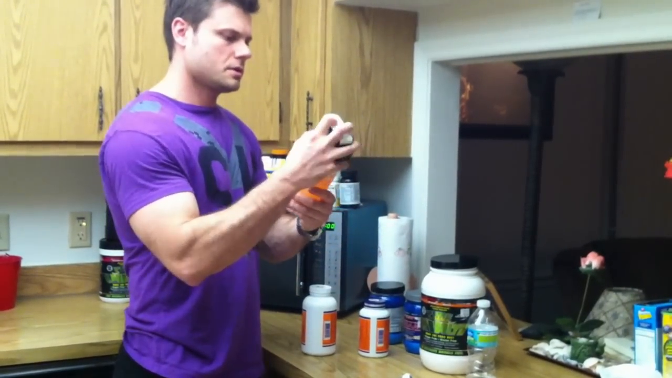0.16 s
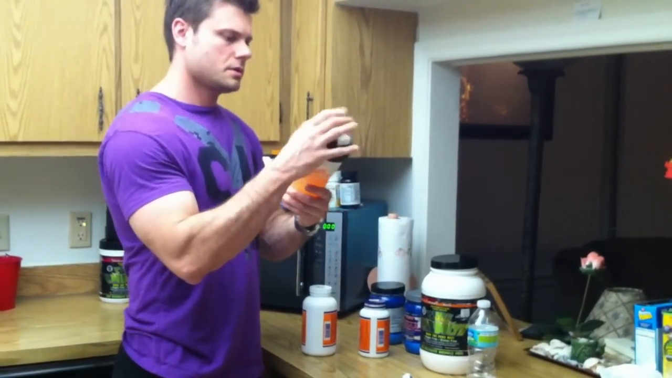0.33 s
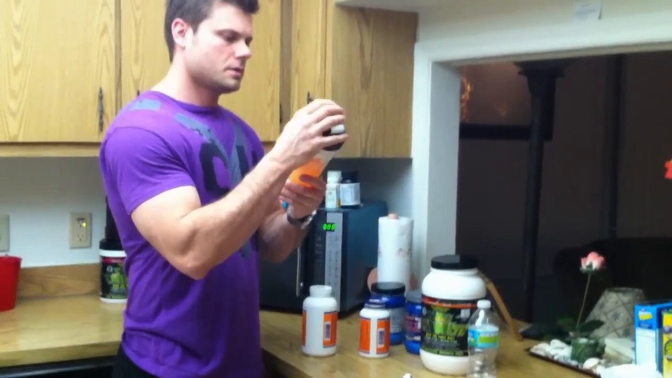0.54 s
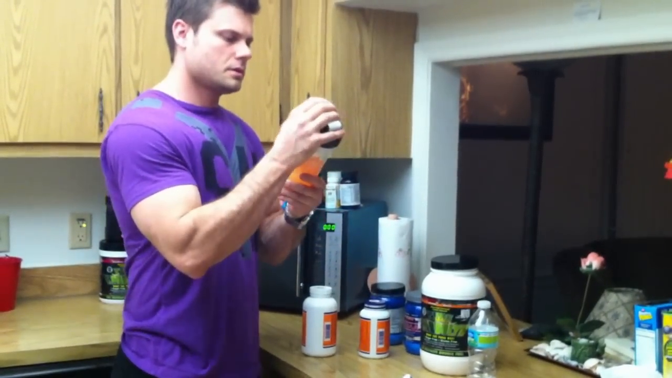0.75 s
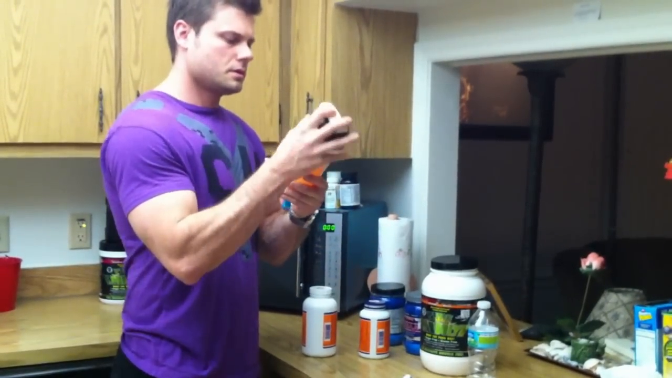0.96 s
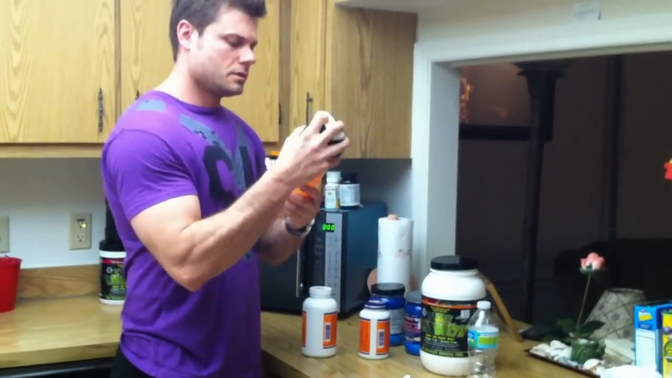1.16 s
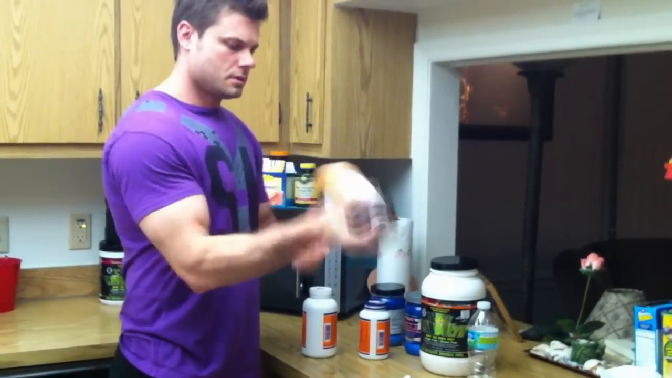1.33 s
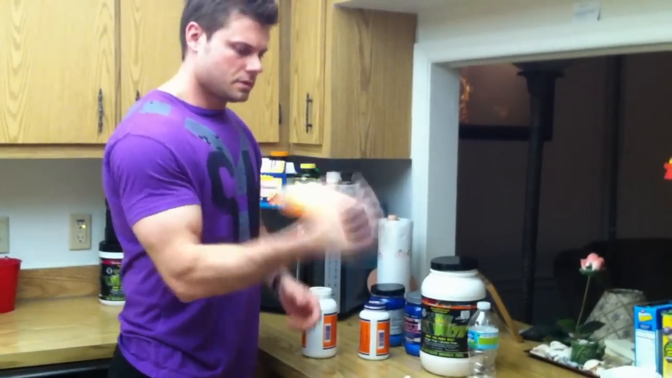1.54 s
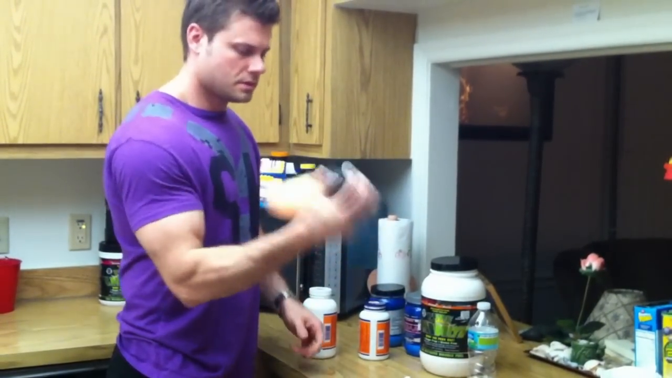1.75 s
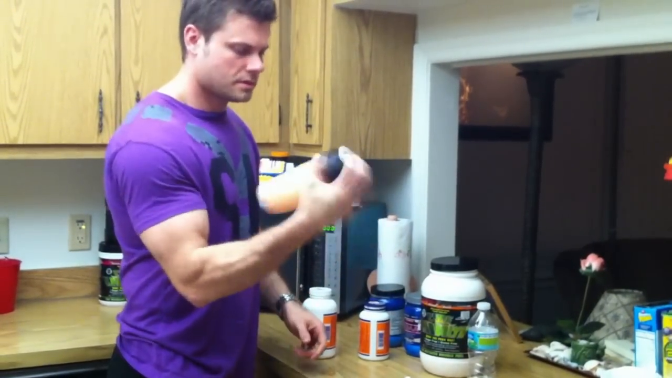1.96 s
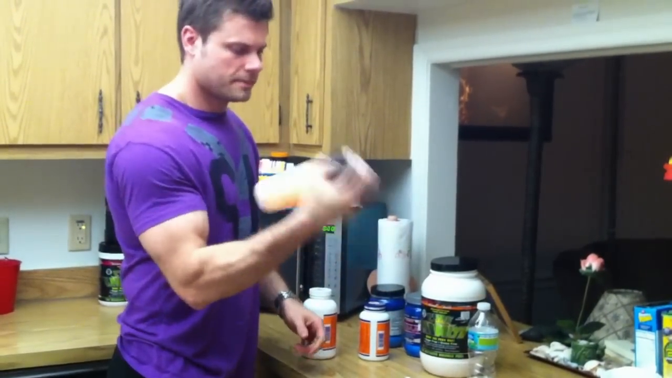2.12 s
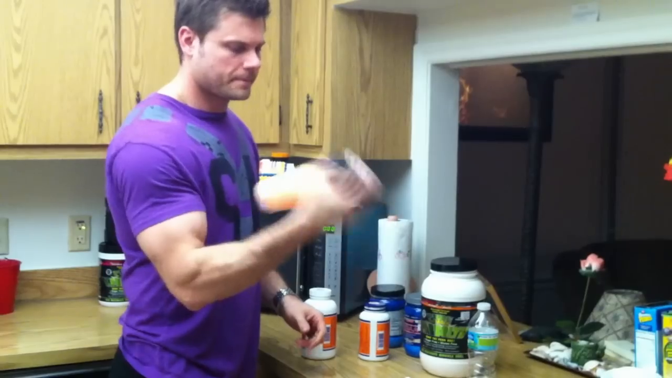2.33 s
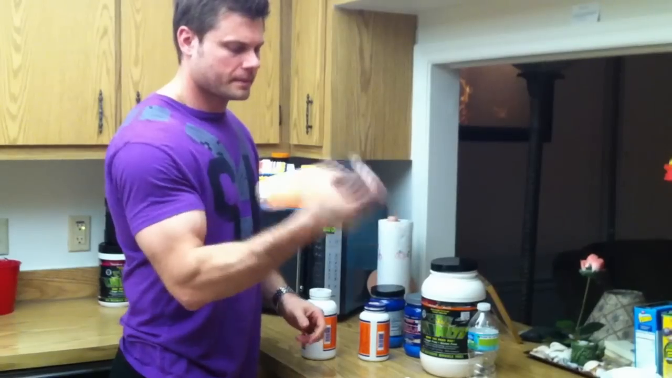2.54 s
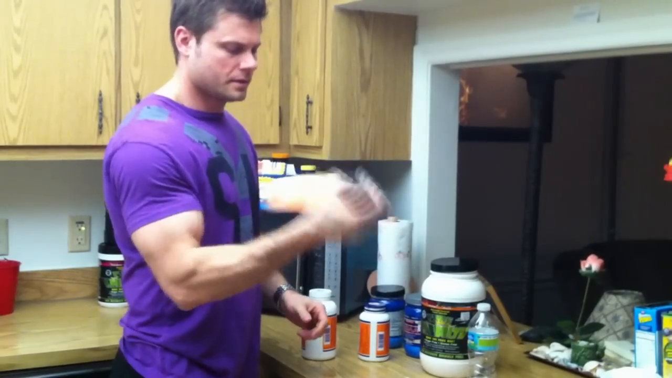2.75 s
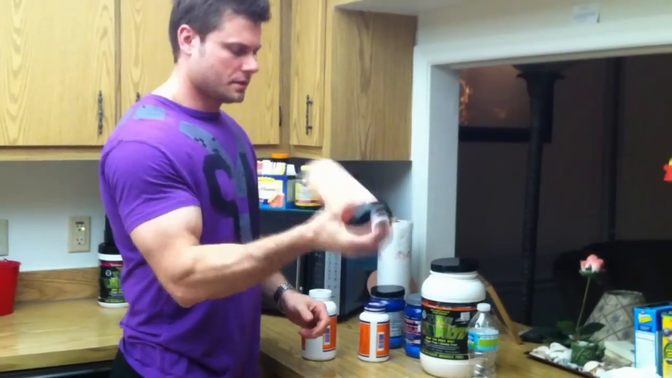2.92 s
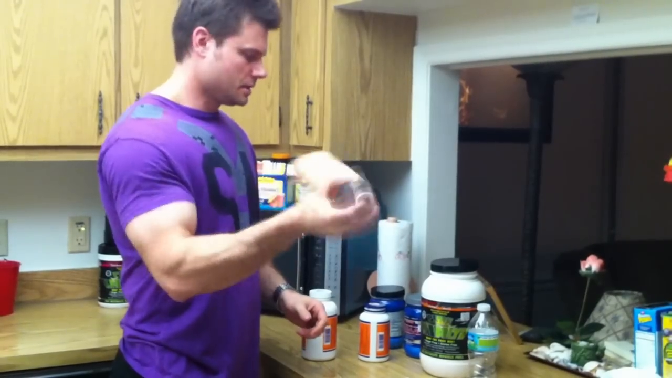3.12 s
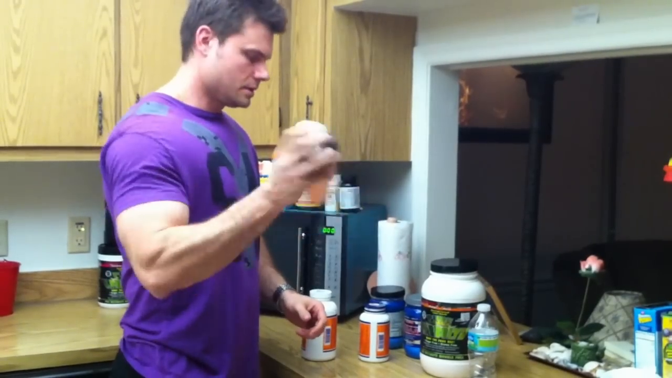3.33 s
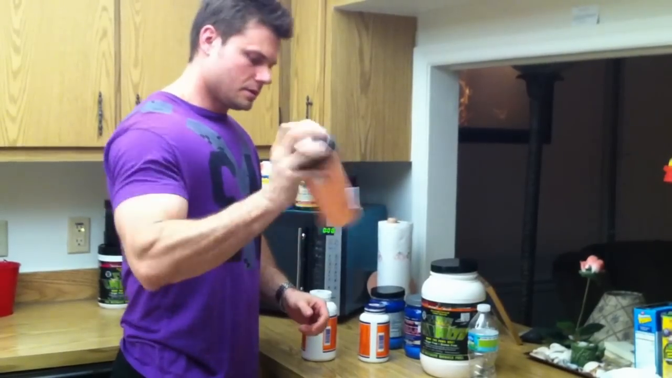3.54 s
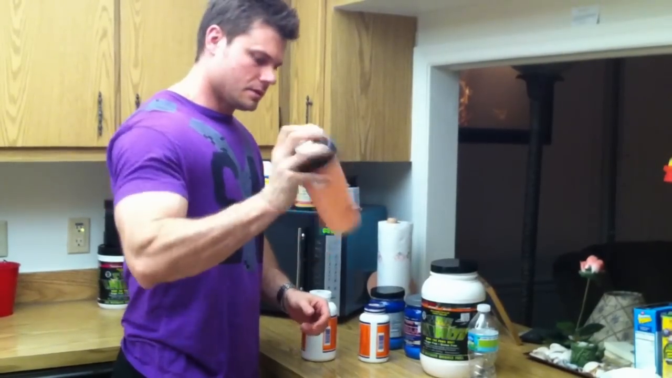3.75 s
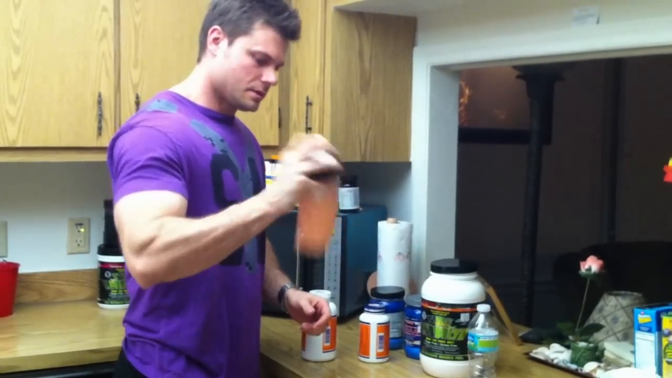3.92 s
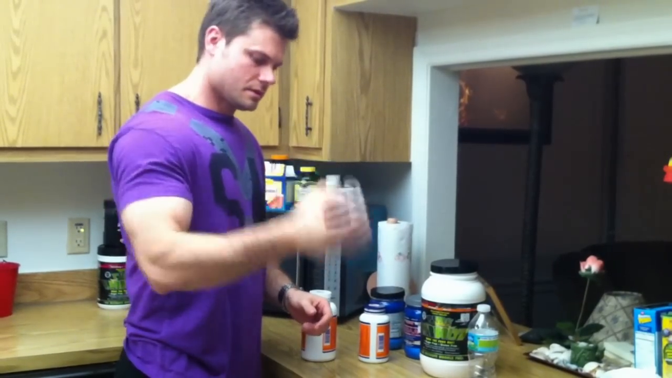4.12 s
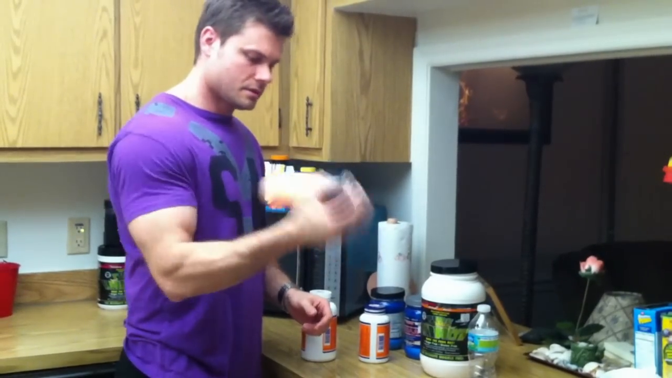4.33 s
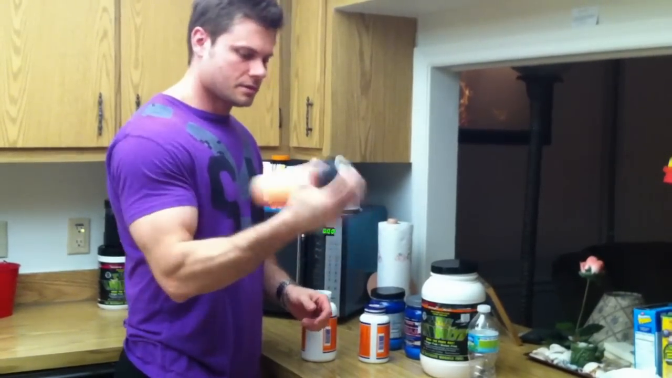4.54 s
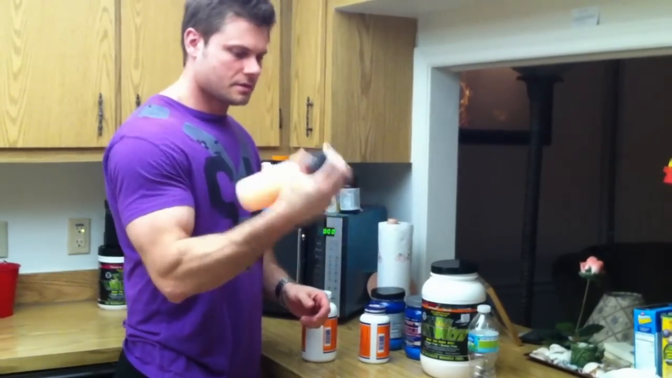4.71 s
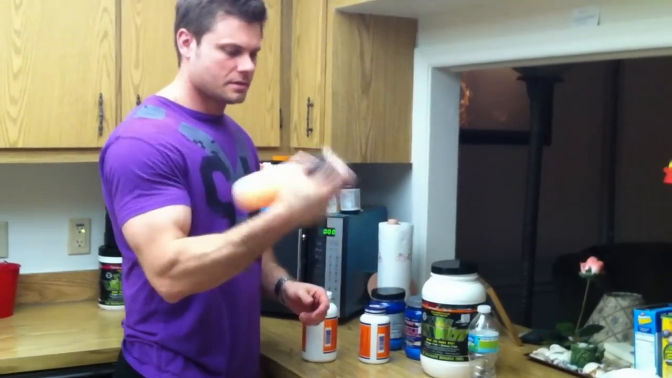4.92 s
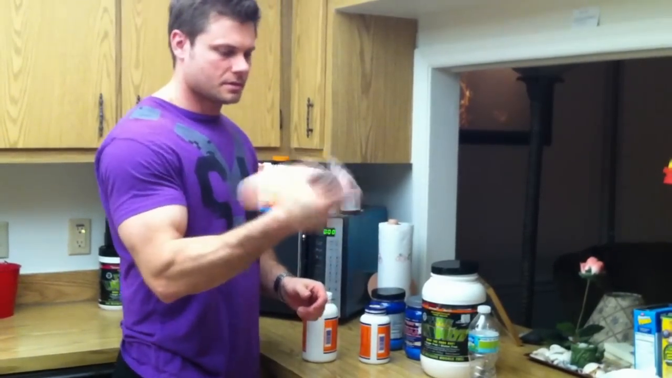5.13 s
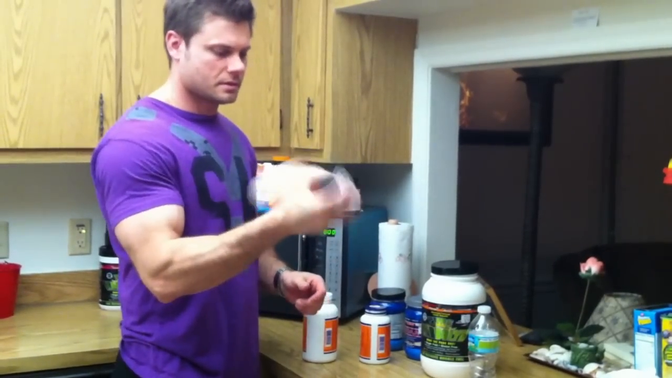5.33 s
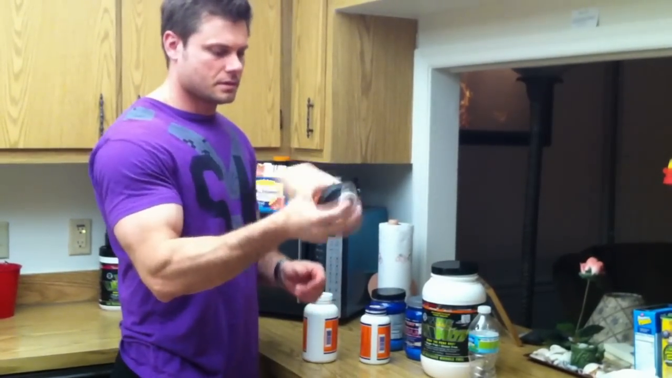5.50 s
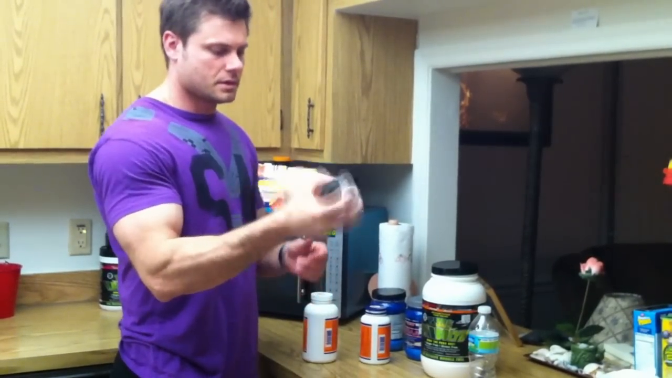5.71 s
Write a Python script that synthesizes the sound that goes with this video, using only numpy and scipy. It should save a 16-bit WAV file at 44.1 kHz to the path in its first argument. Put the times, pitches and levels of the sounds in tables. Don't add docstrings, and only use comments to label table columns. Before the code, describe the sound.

A quiet small kitchen, with soft low room noise and a faint fridge hum. At the very start fingers lightly touch a plastic lid, and two more small dry ticks come near 0.4 s. At 0.78 s the cap snaps shut: a loud, hard, bright plastic crack, with clustered early reflections and a short diffuse tail; the level dips slightly afterwards and recovers. Near-silence follows, with a faint grip tick at 1.37 s. From about 1.5 s the bottle is shaken hard until the end near 5.9 s. About four and a half full cycles per second alternate a bright spraying slap at the lid with a duller, hollow thump and splash-back at the base. Strokes vary in strength, strongest around 2.2 s. Between them the liquid churns, bubbles, gulps air and hisses with fine foam. Hard walls add brief reverberation; the microphone is mono and fairly near, with limited top treble.

```python
import sys
import numpy as np
from scipy import signal
from scipy.io import wavfile
from scipy.ndimage import uniform_filter1d

SR = 44100
rng = np.random.default_rng(int(sys.argv[2]) if len(sys.argv) > 2 else 0)


def pcm_store(signal):
    levels = np.round(np.clip(np.atleast_2d(signal), -1, 1) * 32767)
    wavfile.write(sys.argv[1], SR, levels.astype(np.int16).T)


def undo_db(level):
    steps = np.asarray(level, float) / 20
    return 10 ** steps


N = 258731
T = np.arange(N) / SR

# f/Hz, level/dB
AIR_SPECTRUM = [(15, -20.5), (30, -29.5), (60, -27.5), (90, -20.5), (115, -16.5), (160, -8), (250, -6.5),
                (460, -7), (1000, -13), (1800, -14.5), (2300, -20.5), (5800, -23.5), (9800, -25.5),
                (11500, -30)]
AIR_DB = -60.5
# f/Hz, level/dB, line width/Hz
FRIDGE_TONES = [(122, -79.5, 6.), (240, -80, 11), (355, -80, 13), (365, -86.5, 12), (466, -75.5, 9)]
# t/s, peak level/dB, length/s
FINGER_TICKS = [
    (0.011, -44.5, 0.012),
    (0.025, -49, 0.02),
    (0.377, -50, 0.017),
    (0.398, -42, 0.0126),
    (0.4544, -53.5, 0.02),
    (1.366, -49, 0.012),
]
# t/s, peak level/dB
SNAP_ARRIVALS = [
    (.7810, 3),
    (.7826, 4),
    (.7858, -2),
    (.7872, -1),
    (.7897, 1),
    (.7946, 2),
    (.8033, -4),
    (.8083, -4),
]
# f/Hz, level/dB
CAP_SPECTRUM = [(90, -68), (150, -36), (330, -28.5), (575, -33), (780, -22), (1030, -15.5), (1560, -5.5),
                (2250, 0), (2900, -6.5), (3500, -14), (5300, -11), (7000, -16.5), (8600, -24.5),
                (10300, -19.5), (11500, -23.5)]
# f/Hz, width/Hz
CAP_MODES = [(2250, 850), (5300, 670), (7000, 1300), (10200, 530)]
# f/Hz, T60/s
KITCHEN_T60 = [(250, 0.36), (660, 0.28), (1740, 0.32), (4590, 0.36)]
# t/s, level/dB
CHURN_EFFORT = [(1.5, -72), (1.6, -50.5), (1.71, -48.5), (2.39, -47), (2.85, -46.5), (3.18, -50),
                (3.99, -48), (4.2, -51), (4.4, -48), (5.06, -49), (5.63, -49.5), (5.73, -47.5),
                (5.87, -53.5)]
# f/Hz, level/dB
WALL_SPECTRUM = [(71, -46), (120, -16.5), (256, -4.5), (416, -10.5), (470, -7), (522, -10), (787, -2.5),
                 (1020, -5), (1730, -2.5), (2140, -1), (3750, -14.5), (4500, -14), (5850, -34),
                 (9900, -120)]
# f/Hz, level/dB
SPRAY_SPECTRUM = [(1800, -14), (3000, -5), (4000, -5.5), (5600, -4), (7000, -13.5), (8500, -11),
                  (10000, -11), (11500, -12)]
# f/Hz, level/dB
FOAM_SPECTRUM = [(1800, -22), (3000, -1), (4000, -3.5), (5800, -1.5), (7200, -6), (8500, -8), (10000, -12),
                 (11500, -13)]
# t/s, slap level/dB, slap length/s, spray lead/s, spray level/dB
LID_THROWS = [(1.531, -46, 0.053, 0.0034, -37.5), (1.7535, -34.5, .054, 0.019, -33),
              (1.983, -32.5, .06, 0.017, -29.5), (2.203, -26, 0.029, 0.018, -27),
              (2.427, -30, 0.037, 0.013, -29), (2.653, -38.5, 0.046, 0.03, -31.5),
              (2.845, -37, 0.04, 0.0048, -30), (3.087, -31, 0.028, 0.023, -29),
              (3.3045, -37, 0.06, 0.028, -34), (3.5183, -31, 0.024, 0.0069, -31.5),
              (3.713, -40.5, 0.096, 0.017, -37.5), (3.918, -31.5, 0.027, 0.017, -33.5),
              (4.131, -28.5, 0.021, 0.014, -34), (4.3235, -36.5, 0.067, 0.0071, -34),
              (4.57, -32.5, .034, 0.012, -31), (4.766, -35.5, 0.052, .018, -32),
              (5.0166, -30, 0.024, 0.02, -30.5), (5.23, -41, 0.059, 0.019, -35),
              (5.464, -39.5, 0.043, 0.031, -36.5), (5.6764, -32, 0.029, 0.0058, -31)]
# t/s, thump level/dB, air pocket f/Hz, jolt level/dB
BULK_LANDINGS = [(1.538, -64, 750, -46), (1.766, -38.5, 695, -40), (2.005, -39.5, 710, -44),
                 (2.217, -34, 840, -40), (2.435, -41, 795, -43), (2.675, -59, 805, -47),
                 (2.834, -43, 1210, -49), (3.082, -39.5, 795, -64), (3.111, -42, 1290, -58),
                 (3.313, -40.5, 778, -50), (3.525, -61, 730, -45), (3.933, -38, 666, -46),
                 (4.145, -43, 794, -59), (4.339, -34.5, 850, -40.5), (4.577, -41, 725, -55),
                 (4.788, -36.5, 1300, -52), (5.008, -49, 800, -48), (5.235, -62, 800, -52),
                 (5.493, -39, 856, -54), (5.698, -46, 965, -51)]
# t/s, thump level/dB, air pocket f/Hz, jolt level/dB, splash-back level/dB
BASE_THROWS = [(1.654, -38, 1390, -60, -40), (1.902, -41.5, 1270, -56, -49), (2.112, -35.5, 1360, -40, -43),
               (2.323, -38, 1300, -40.5, -54), (2.536, -38, 1340, -45, -42.5), (2.75, -42.5, 730, -59, -44),
               (2.939, -45.5, 1340, -52, -55), (3.196, -41, 1480, -46, -54), (3.419, -38.5, 980, -42, -65),
               (3.606, -40.5, 1190, -60, -54), (3.8, -50, 1280, -58, -40), (4.024, -35, 820, -43.5, -37.5),
               (4.232, -38, 1170, -40.5, -50), (4.462, -38, 1360, -43, -58),
               (4.684, -39.5, 1190, -40.5, -46), (4.915, -39, 1260, -49, -44), (5.13, -37.5, 890, -45, -41),
               (5.352, -37.5, 1370, -45, -47), (5.575, -44, 1230, -66, -54), (5.797, -40.5, 1310, -48, -59)]
# t/s, slap level/dB, spray level/dB
STRAY_TONGUES = [(1.5567, -51, -59), (1.664, -41.5, -41), (3.178, -38, -55), (3.0755, -45, -43),
                 (1.8435, -44, -36.5), (2.6841, -39, -52), (2.7156, -45, -43), (3.2823, -47, -56),
                 (3.6405, -44, -55), (4.07, -49, -33), (4.7075, -40, -54), (4.7914, -51, -48),
                 (4.9869, -37, -45), (5.173, -56, -39.5), (5.255, -53, -38), (5.405, -55, -39),
                 (5.5137, -40.5, -39.5), (5.7646, -40.5, -48)]
# t/s, peak level/dB, f/Hz
AIR_GULPS = [(1.772, -46, 329), (2.005, -45, 730), (2.225, -45, 790), (2.33, -47, 1290), (3.095, -46, 802),
             (3.212, -50, 429), (3.682, -41, 5770), (3.925, -39, 702), (4.027, -44, 802), (4.033, -44, 258),
             (4.1345, -40, 2240), (4.231, -46, 1170), (4.245, -50, 476), (4.348, -45, 850),
             (4.487, -43, 498), (4.705, -47, 478), (4.92, -44, 760), (5.133, -42, 856), (5.679, -36, 2150)]

LID_HZ, SPLASH_HZ, SPRAY_HZ, PITCH_SCATTER = 2240, 2110, 5700, 0.023
LID_JOLT_HZ, BASE_JOLT_HZ, JOLT_LAG_S, JOLT_S = 265, 396, 0.01112, 0.018
SPRAY_S, SPRAY_SHARE = 0.022, 0.34
SPLASH_S, SPLASH_LAG_S, SPLASH_SLAP_DB = 0.032, 0.004, -3
THUMP_S, THUMP_AT_DB, SHORTER_PER_DB = 0.033, -41.5, 0.06
SLAP_CONTACT, SPRAY_CONTACT, THUMP_CONTACT, JOLT_CONTACT = 4, 5.2, 8.2, 8
SUDDEN = 0.3
FOAM_DB, FOAM_HUSH = -6, 0.76
GULP_S, GULP_RISE_S, GULP_GLIDE, SMALL_IS_SHORT = 0.0111, 0.0022, 0.0503, 0.31


def evened(x):
    return x / np.sqrt(np.mean(x ** 2) + 1e-20)


def read(points, hz):
    f, value = np.transpose(points)
    return np.interp(np.log(hz + 1), np.log(f + 1), value)


def colour(points, size=4096):
    level_db = read(points, abs(np.fft.fftfreq(size, 1 / SR)))
    log_gain = np.log(undo_db(np.maximum(level_db, -100)))
    spectrum = np.exp(np.conj(signal.hilbert(log_gain)))
    taps = np.fft.ifft(spectrum).real[:size // 2]
    return taps / np.linalg.norm(taps)


def through(x, taps):
    return signal.oaconvolve(x, taps)[:N]


def droplets(per_s, spread_db):
    size_db = spread_db * np.minimum(rng.exponential(1, N), 4)
    size = undo_db(size_db) * rng.choice([-1., 1.], N)
    return evened(size * (rng.random(N) < per_s / SR))


def surge(s, db, length, rise):
    start = int(s * SR)
    u = np.maximum(T[start:start + SR // 5] - s, 0)
    return start, undo_db(db) * (1 - np.exp(-u / rise)) * np.exp(-u / max(length, .002))


def bursts(rows, rise):
    power = np.zeros(N)
    for s, db, length in rows:
        start, shape = surge(s, db, length, rise)
        power[start:start + len(shape)] += shape ** 2
    return np.sqrt(power)


def ringing(rows, drive, rise, width_share):
    out = np.zeros(N)
    for s, db, hz, length, contact in rows:
        start, shape = surge(s, db, length, rise)
        push = shape * drive[start:start + len(shape)]
        push[[20, 90]] += contact * undo_db(db)
        r = np.exp(-np.pi * width_share * hz / SR)
        poles = [1, -2 * r * np.cos(2 * np.pi * hz / SR), r * r]
        ring = signal.lfilter([1, 0, -1], poles, push)
        ring = signal.lfilter([1, 0, -1], poles, ring)
        out[start:start + len(shape)] += ring * ((1 - r * r) / 2) ** (3 / 2)
    return out


def tail(gap_s, slower=1):
    taps = np.zeros(SR // 2)
    at = np.arange(0, len(taps) - 12, 12)
    taps[at + rng.integers(0, 12, len(at))] = rng.choice([-1., 1.], len(at))
    hz, t, z = signal.stft(taps, SR, nperseg=128)
    decay = undo_db(-60 * t / slower / read(KITCHEN_T60, hz)[:, None])
    taps = signal.istft(z * decay, SR, nperseg=128)[1]
    taps = taps * (1 - np.exp(-np.arange(len(taps)) / SR / gap_s))
    return taps / np.linalg.norm(taps)


def air():
    frames, hz = N // 1024 + 5, np.fft.rfftfreq(4096, 1 / SR)
    a, b, patches = rng.standard_normal((frames, 2049, 3)).T
    patches = uniform_filter1d(patches, size=30, axis=0)
    patches = evened(uniform_filter1d(patches, size=3, axis=1))
    z = (a + 1j * b) * undo_db(read(AIR_SPECTRUM, hz)[:, None] + 0.52 * patches)
    out = undo_db(AIR_DB) * evened(signal.istft(z, nperseg=4096, noverlap=3072)[1][:N])
    for f, db, width in FRIDGE_TONES:
        walk = uniform_filter1d(np.cumsum(rng.standard_normal(N)), size=1200)
        wander = walk * np.sqrt(2 * np.pi * width / SR)
        out += np.sqrt(2) * undo_db(db + 2.0) * np.sin(2 * np.pi * f * T + wander)
    return out


def fingers():
    contacts = bursts(FINGER_TICKS, .003) * droplets(5600, 2.02)
    ticks = through(contacts, colour(CAP_SPECTRUM))
    return undo_db(-7.5) * (ticks + 0.86 * np.diff(ticks, prepend=0))


def snap():
    click = colour(CAP_SPECTRUM)
    for hz, width in CAP_MODES:
        r, turn = np.exp(-np.pi * width / SR), np.cos(2 * np.pi * hz / SR)
        click = signal.lfilter([r * r, -2 * r * turn, 1], [1, -2 * r * turn, r * r], click)
    hits = np.zeros(N)
    for s, db in SNAP_ARRIVALS:
        near = round(s * SR) + np.arange(-16, 17)
        hits[near] += undo_db(db + 7.0) * np.sinc(near - s * SR) * np.hanning(33)
    release_s = SNAP_ARRIVALS[0][0]
    before = release_s - T
    creep = undo_db(-27 - 3200 * np.clip(before, 0, .1)) * (before > 0) * rng.standard_normal(N)
    fading = tail(.006)
    fading = fading + undo_db(-16.5) * tail(.05, slower=1.65)
    late = np.roll(np.pad(fading, (0, N))[:N], round(release_s * SR))
    return through(hits + creep + undo_db(17.0) * late, click)


def scattered(rows):
    return [(s, db, hz * np.exp(PITCH_SCATTER * rng.standard_normal()), *rest) for s, db, hz, *rest in rows]


def landings():
    slaps, sprays = [], []
    for s, slap_db, length, lead, spray_db in LID_THROWS:
        slaps.append((s, slap_db, LID_HZ, length, SLAP_CONTACT * (SPLASH_S / length) ** SUDDEN))
        sprays.append((s - lead, spray_db, SPRAY_HZ, SPRAY_S + SPRAY_SHARE * length, SPRAY_CONTACT))
    splashes = [(s + SPLASH_LAG_S, db + SPLASH_SLAP_DB, db) for s, *_, db in BASE_THROWS]
    for s, slap_db, spray_db in splashes + STRAY_TONGUES:
        slaps.append((s, slap_db, SPLASH_HZ, SPLASH_S, SLAP_CONTACT))
        sprays.append((s, spray_db, SPRAY_HZ, SPLASH_S, SPRAY_CONTACT))
    thumps, jolts = [], []
    for rows, jolt_hz in ((BULK_LANDINGS, LID_JOLT_HZ), (BASE_THROWS, BASE_JOLT_HZ)):
        for s, db, pocket_hz, jolt_db, *_ in rows:
            length = min(THUMP_S * np.exp(-SHORTER_PER_DB * (db - THUMP_AT_DB)), .08)
            thumps.append((s, db, pocket_hz, length, THUMP_CONTACT))
            jolts.append((s + JOLT_LAG_S, jolt_db, jolt_hz, JOLT_S, JOLT_CONTACT))
    return scattered(slaps), scattered(sprays), thumps, scattered(jolts)


def flight(rows):
    hush_db = np.zeros(N)
    for s, db, *_ in rows:
        end = int(s * SR)
        approach = np.exp(-(s - T[end - 4000:end]) / 0.085)
        hush_db[end - 4000:end] += 0.11 * max(db + 47.0, 0) * approach
    return undo_db(-np.minimum(hush_db, 12))


def spraying(rows):
    mist = droplets(7000, 1.0)
    envelope = bursts([(s, db, length) for s, db, _, length, _ in rows], 0.026)
    broad = through(envelope * mist, colour(SPRAY_SPECTRUM))
    return undo_db(-5) * broad + undo_db(-16) * ringing(rows, mist, 0.0045, 0.58)


def slapping(rows):
    return undo_db(-6.5) * ringing(rows, droplets(3000, 1.0), 0.00069, 0.39)


def thumping(rows):
    pockets = undo_db(-5) * ringing(rows, droplets(3000, 2.2), 0.011, 0.35)
    envelope = bursts([(s, db, length) for s, db, _, length, _ in rows], 0.0051)
    return pockets + undo_db(-6.0) * through(envelope * droplets(4000, 2.9), colour(WALL_SPECTRUM))


def jolting(rows):
    return undo_db(-3.5) * ringing(rows, droplets(1200, 5.6), 0.0069, 0.84)


def bubbles(per_s, low_hz, high_hz, cycles, count):
    out = np.zeros(N)
    for hz in np.geomspace(low_hz, high_hz, count):
        u = np.arange(int(3 * cycles / hz * SR)) / SR * hz / cycles
        note = np.sin(2 * np.pi * cycles * u * (1 + 0.15 * u))
        note = note * np.exp(-2 * u) * (1 - np.exp(-12 * u))
        out += through(droplets(per_s / count, 1.5), note / np.linalg.norm(note)) * np.sqrt(hz)
    return evened(out)


def churning(drive):
    stirred = 1.29 * droplets(3000, 2.5) + 0.47 * bubbles(600, 300, 3700, 2.5, count=10)
    return through(undo_db(-5) * drive * stirred, colour(WALL_SPECTRUM))


def foaming(drive):
    return through(undo_db(FOAM_DB) * drive * droplets(8000, 2.9), colour(FOAM_SPECTRUM))


def clumped(x, depth_db):
    z = signal.stft(x, nperseg=256)[2]
    patches = rng.standard_normal(z.shape[::-1]).T
    patches = uniform_filter1d(patches, size=3, axis=0)
    patches = evened(uniform_filter1d(patches, size=10, axis=1))
    return signal.istft(z * undo_db(depth_db * patches), nperseg=256)[1][:N]


def gulps():
    out = np.zeros(N)
    for s, db, hz in AIR_GULPS:
        length = GULP_S * (1000 / hz) ** SMALL_IS_SHORT
        start, shape = surge(s, db, length, GULP_RISE_S * 1000 / hz)
        u = np.arange(len(shape)) / SR
        glide = 1 + GULP_GLIDE * np.minimum(u / length, 4)
        out[start:start + len(shape)] += shape * np.sin(2 * np.pi * hz * u * glide)
    return out


def slosh():
    slaps, sprays, thumps, jolts = landings()
    effort = undo_db(np.interp(T, *np.transpose(CHURN_EFFORT), left=-120))
    hush = flight(sprays + slaps + thumps)
    impacts = slapping(slaps) + thumping(thumps) + jolting(jolts)
    fine = spraying(sprays) + foaming(effort * hush ** FOAM_HUSH)
    return impacts + gulps() + clumped(fine, 2.23) + clumped(churning(effort * hush), 1.4)


def kitchen(x):
    turn = 2 * np.pi * 1.315 * T
    feeds = [np.sqrt(2 / 3) * np.cos(turn + 2 * np.pi * k / 3) for k in range(3)]
    return sum(through(x * feed, tail(0.00049)) for feed in feeds)


def scene():
    small = signal.butter(4, 130, "high", fs=SR, output="sos")
    bottle = signal.sosfilt(small, slosh() + fingers())
    return (bottle + undo_db(-8.5) * kitchen(bottle) + snap() + air())[None]


def roll_off(x):
    return signal.sosfilt(signal.butter(12, 12090, fs=SR, output="sos"), x)


def record(dry):
    power_db = 10 * np.log10(abs(uniform_filter1d(dry[0] ** 2, 800)) + 1e-12)
    fall = T * 10.7
    peak_db = np.maximum.accumulate(power_db + fall) - fall
    over_db = np.maximum(peak_db + 31.0, 0)
    r = np.exp(-1 / (0.051 * SR))
    ducked = dry / undo_db(0.24 * signal.lfilter([1 - r], [1, -r], over_db))
    edge = signal.firwin(401, 11110, window=("kaiser", 7), fs=SR)
    mix = signal.oaconvolve(ducked, edge[None], "same")
    return roll_off(mix)


dry = scene()
out = record(dry)
pcm_store(out)
```